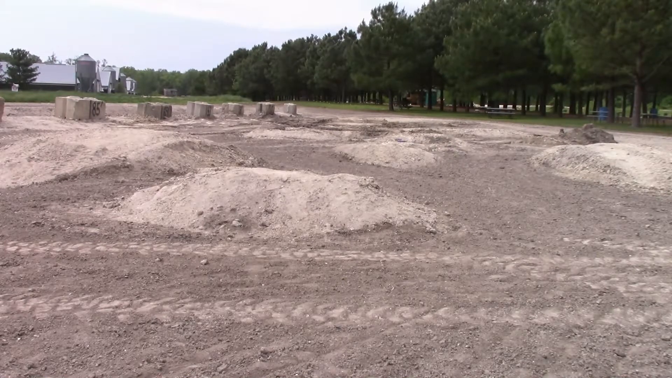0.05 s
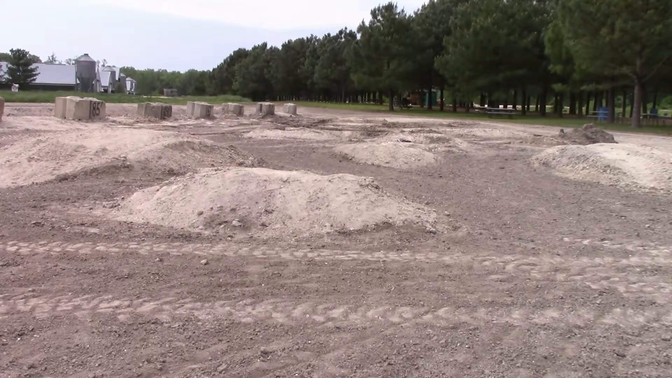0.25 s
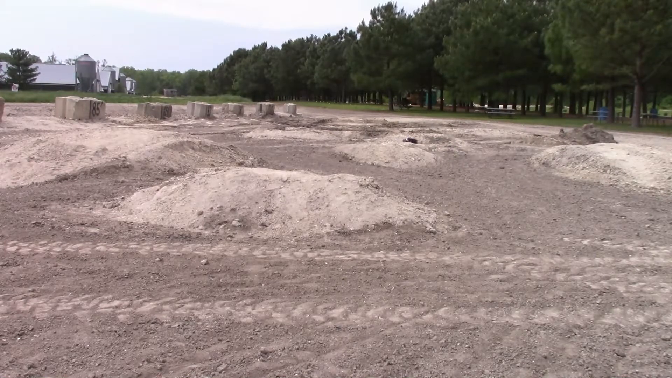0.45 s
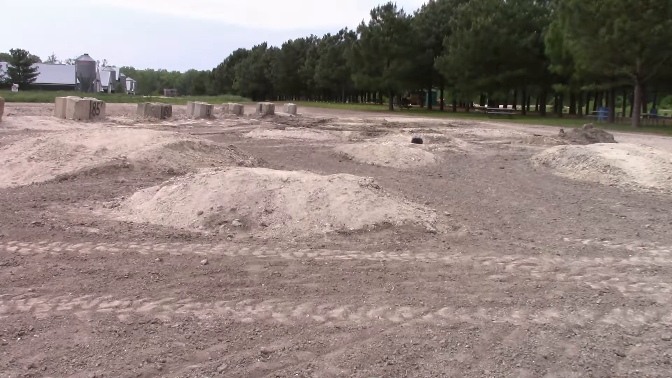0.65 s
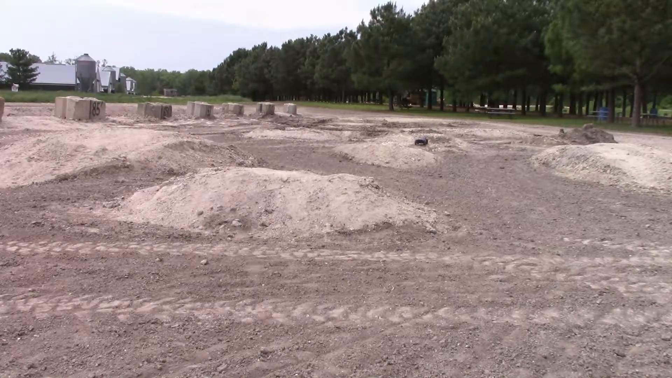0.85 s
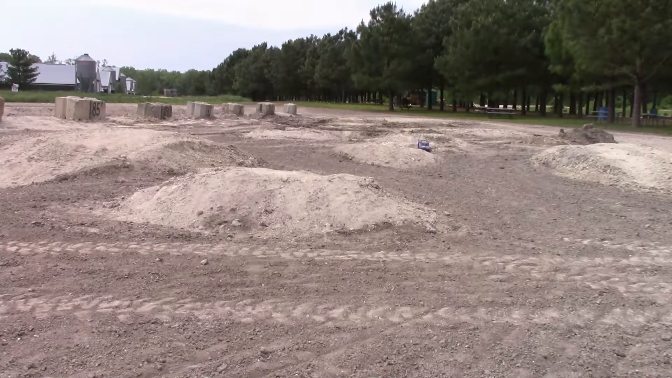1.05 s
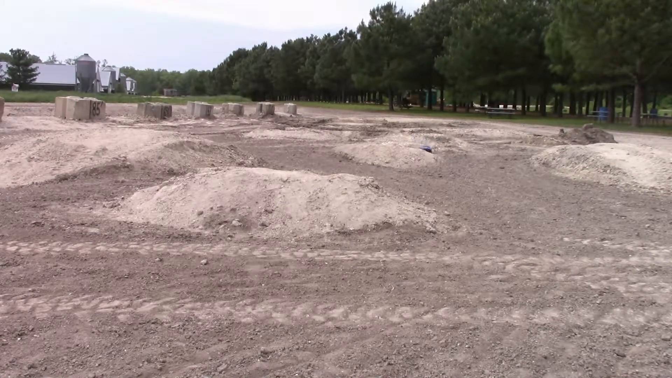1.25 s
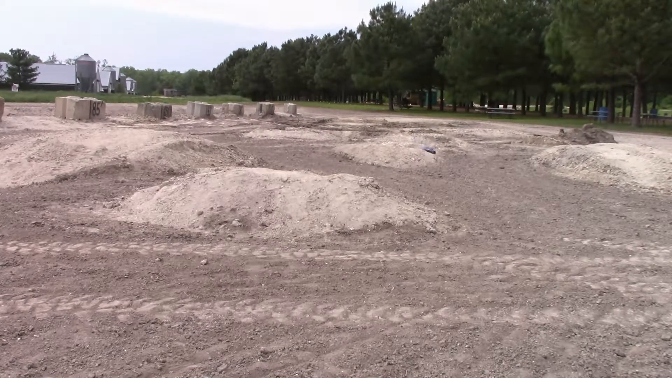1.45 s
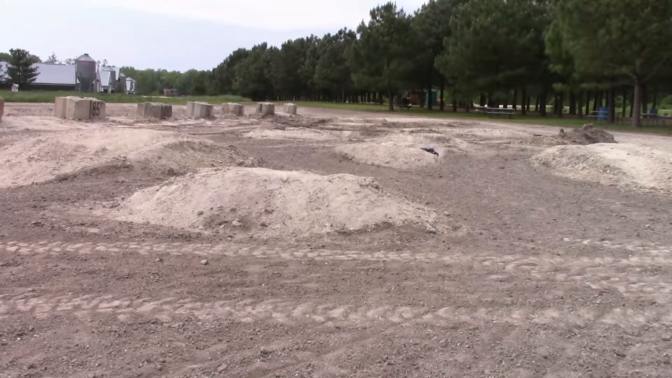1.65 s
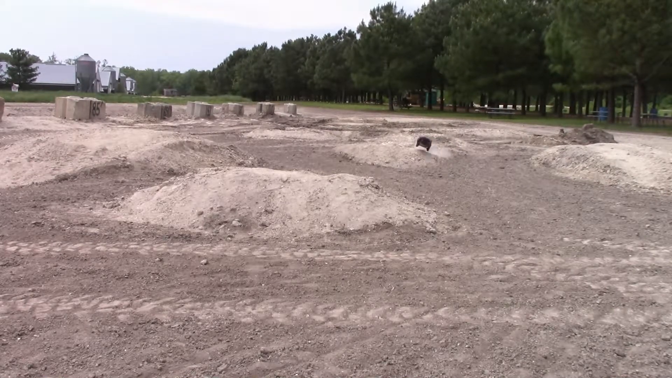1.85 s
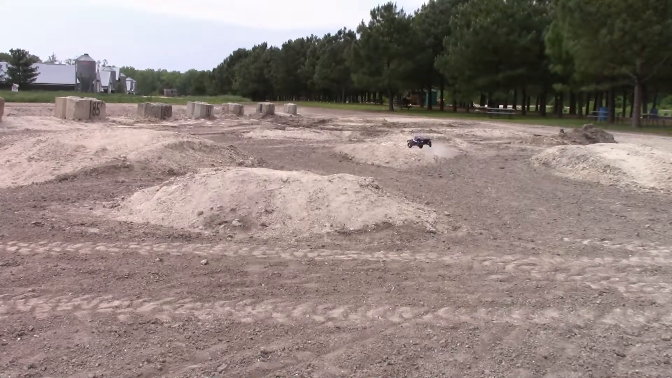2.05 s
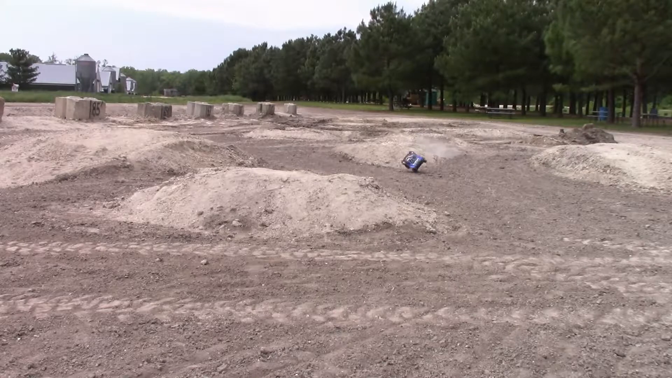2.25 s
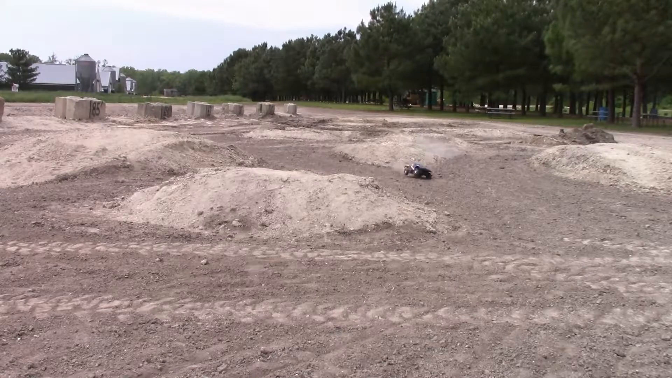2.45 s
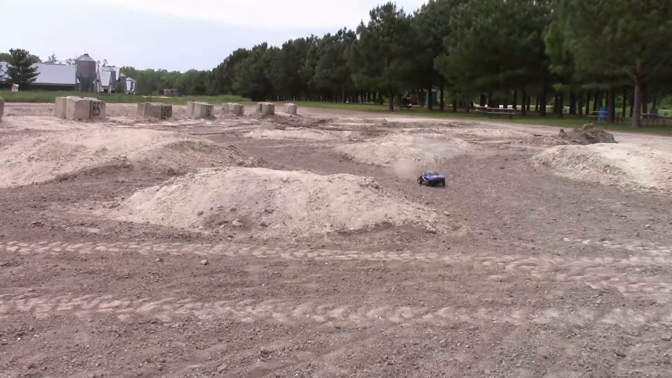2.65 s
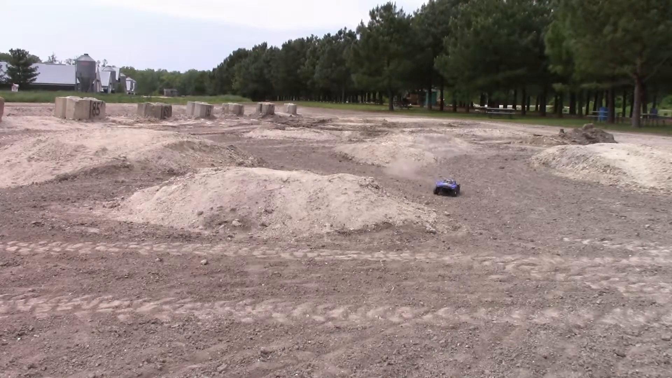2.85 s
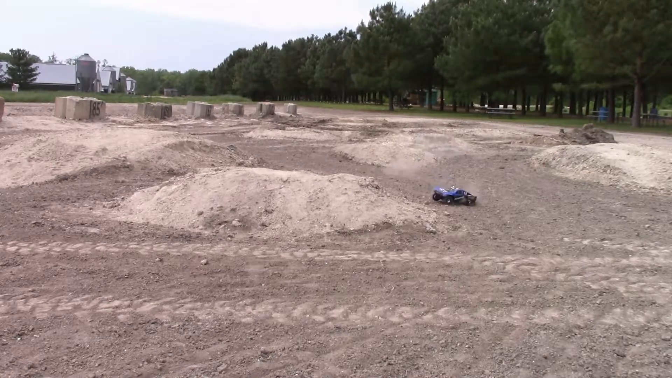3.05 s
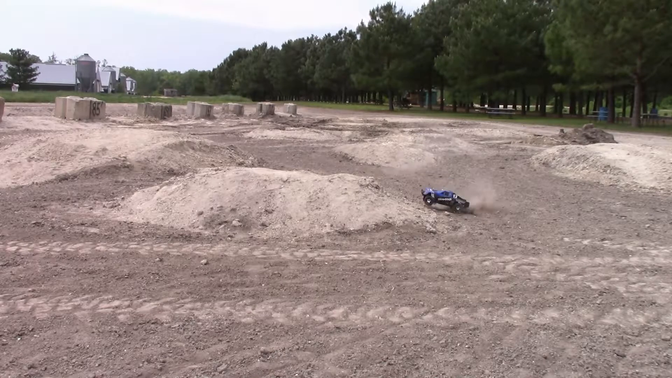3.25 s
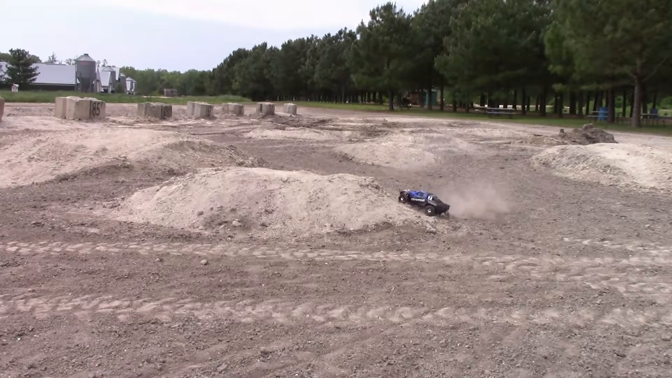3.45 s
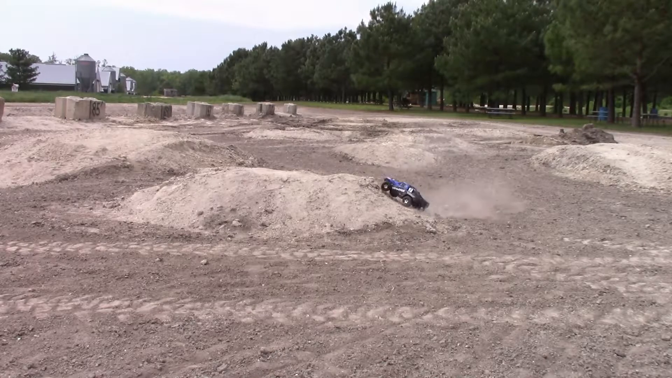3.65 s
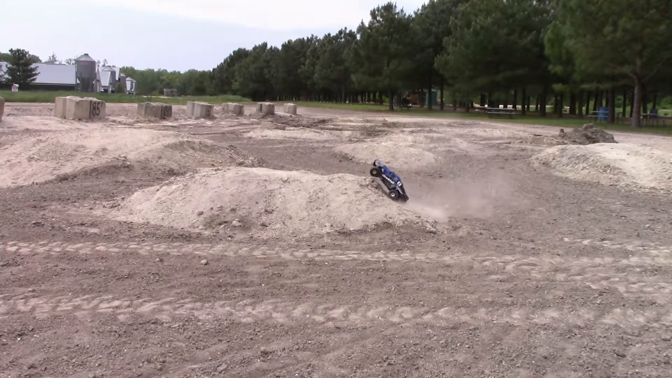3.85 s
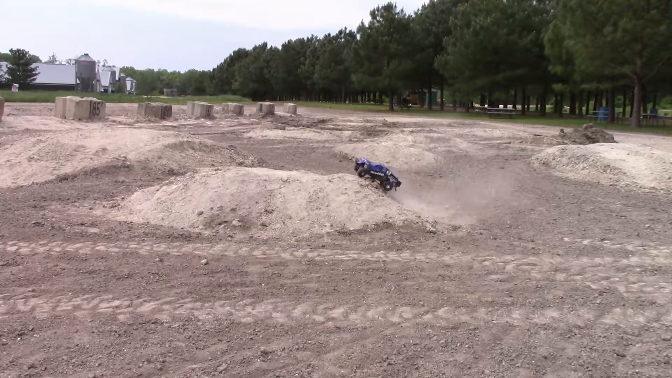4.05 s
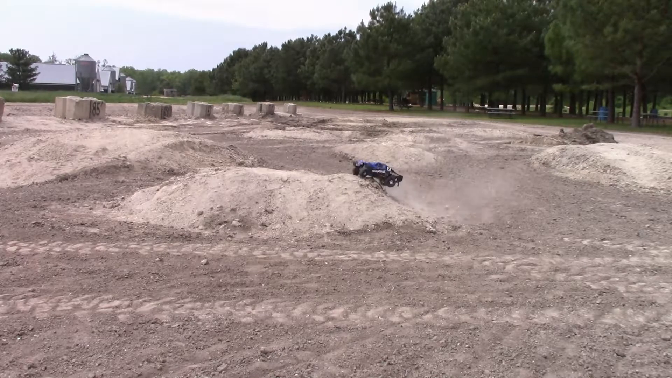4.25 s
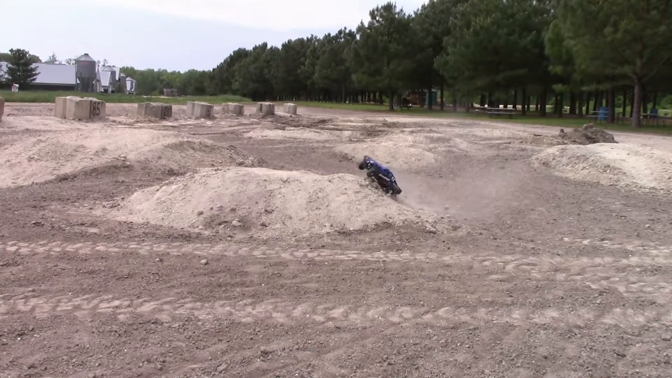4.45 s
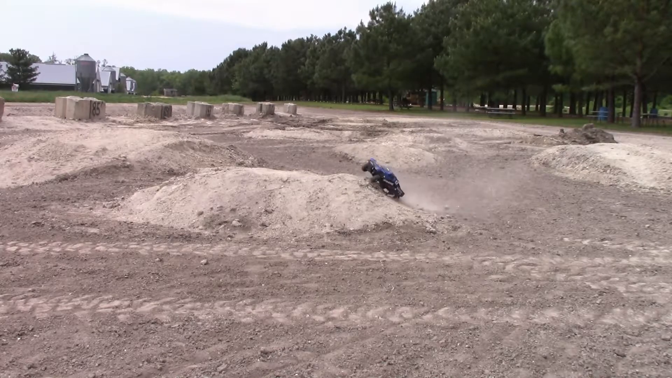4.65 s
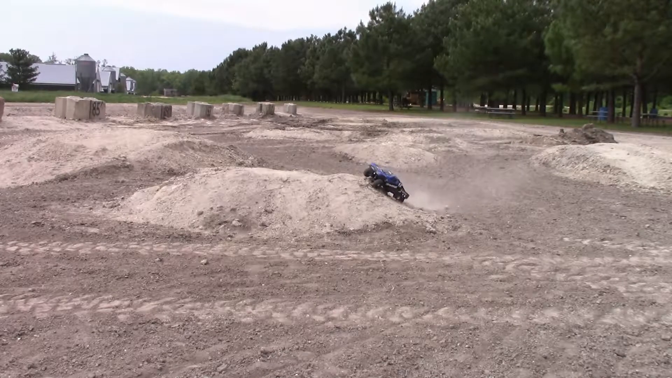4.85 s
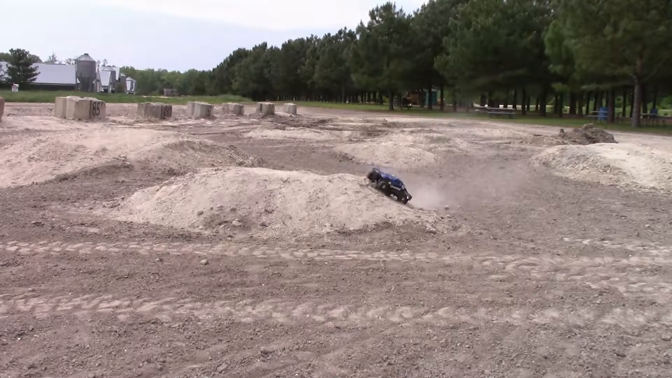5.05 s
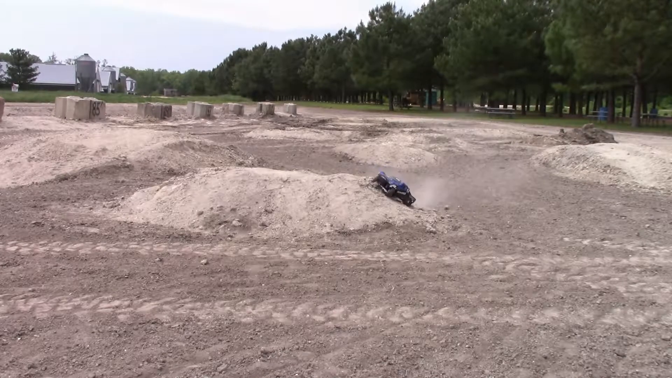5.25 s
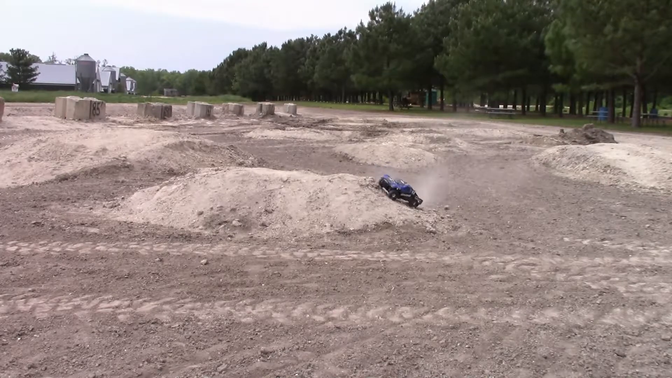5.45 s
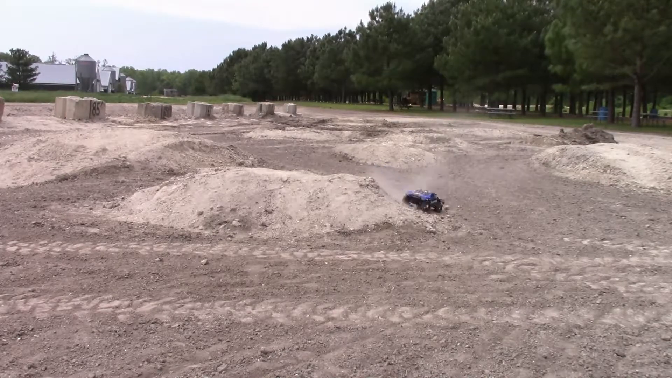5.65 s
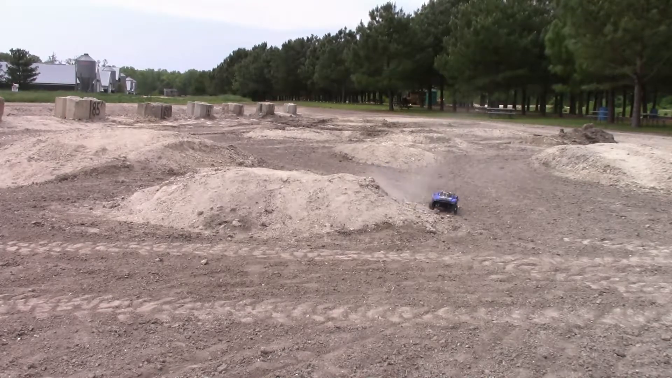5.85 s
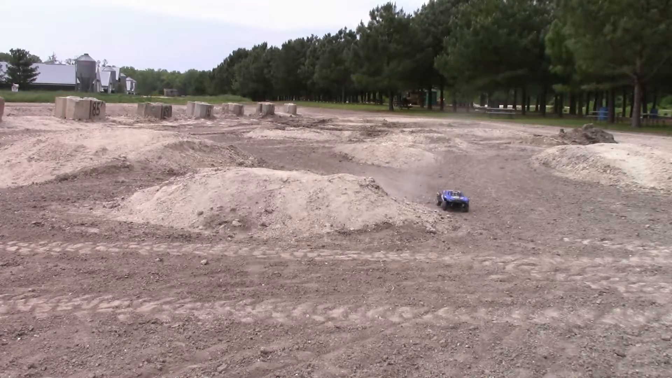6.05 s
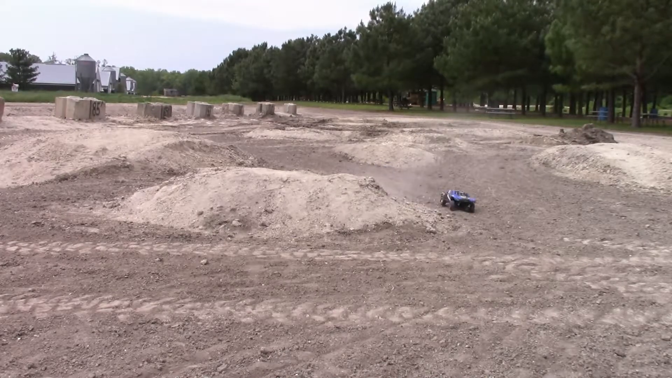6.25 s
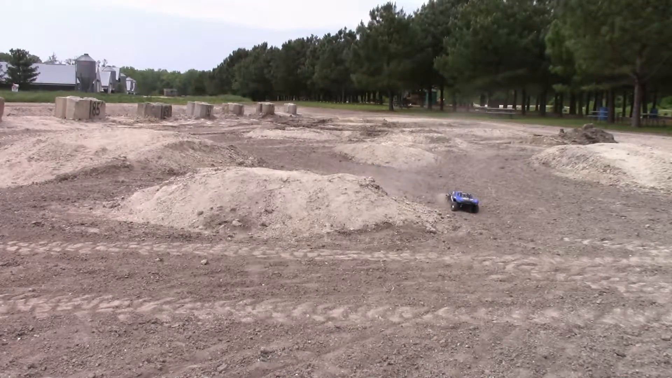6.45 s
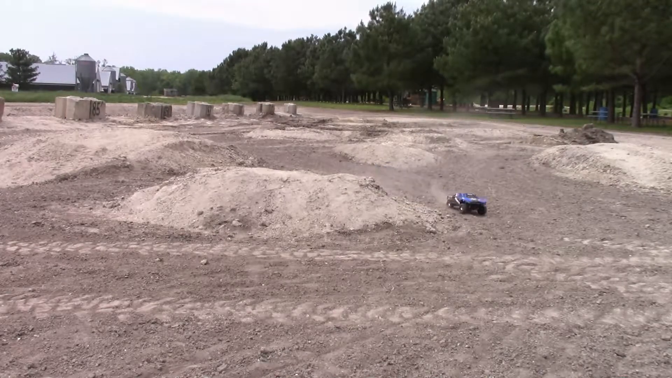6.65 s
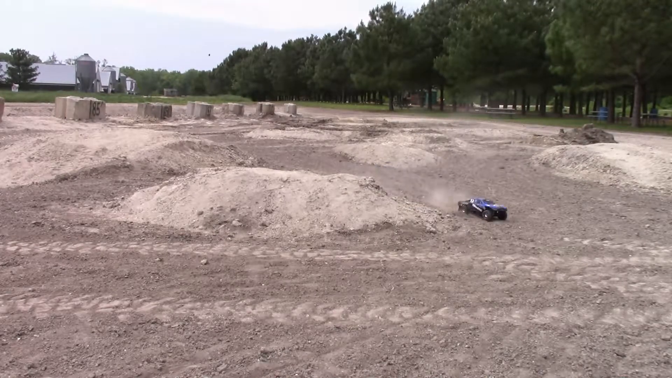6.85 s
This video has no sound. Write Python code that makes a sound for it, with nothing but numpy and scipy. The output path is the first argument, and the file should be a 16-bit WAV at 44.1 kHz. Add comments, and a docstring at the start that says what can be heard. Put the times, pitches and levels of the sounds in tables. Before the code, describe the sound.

An open dirt track with soft wind and barely audible pine hiss. From 0.5 s a small electric truck whines faintly in short, shuddering bursts around a high pitch, with light plastic ticks. At 1.55-1.8 s three much higher zips lead into a smooth, bright rush of free-spinning wheels, peaking near 1.9 s. It lands at 2.3 s with sharp clacks, more following at 2.5 s. From 2.7 s the motor drones upward and tyres roar nearer; between 3 and 4.9 s they scrabble hard, spraying grit, with whine bursts, a strong snap at 3.45 s and another at 4.65 s. Wind thumps the microphone around 3.3 and 4.3-4.8 s. It eases at 5 s into knocks, tiny squeaks and dirt patter. A strong whine rises at 5.45 s, then loose clatter. Brief revs and skids return at 6.25 and 6.55 s, with a hard clack near 6.8 s.

```python
"""Open-air dirt track: a small electric radio-controlled truck jumps, lands and scrabbles up a mound.
Gears: shuddering sine whine with overtones. Tyres: grain noise for roar, whir and grit, plus a jump swell.
Chassis: decaying noise clacks, short sung tones, dirt patter.
Background: low noise gusts and eddies on two microphone ports, fine turbulence, faint hiss of pines."""
import sys
import numpy as np
from scipy import signal
from scipy.fft import rfft, irfft, next_fast_len
from scipy.io import wavfile
from scipy.ndimage import uniform_filter1d, map_coordinates

SR = 44100
rng = np.random.default_rng(int(sys.argv[2]) if len(sys.argv) > 2 else 0)


def wrap_up_sound(samples):
    """Save the sound to the file named by the first command line argument, as 16-bit audio."""
    columns = np.atleast_2d(samples).T
    # keep every value between -1 and 1, then stretch to whole-number steps
    tamed = np.clip(columns, -1, 1)
    steps = np.round(tamed * 32767).astype(np.int16)
    wavfile.write(sys.argv[1], SR, steps)


N = 305172
TOP_HZ = 15810  # upper band limit


def amp(db):
    """Decibels to gain."""
    return 10 ** (np.asarray(db) / 20)


def unit(x):
    """x at rms 1."""
    return x / np.sqrt(np.mean(x ** 2) + 1e-20)


def along(points, hz):
    """(frequency [Hz], value) points read on a log-frequency axis."""
    point_hz, values = np.transpose(points)
    return np.interp(np.log(hz + 1), np.log(point_hz + 1), values)


def curves(rows):
    """One value per sample for each column after the time."""
    time_s, *columns = np.transpose(rows)
    return [np.interp(np.arange(N) / SR, time_s, column) for column in columns]


def wobble(rate):
    """Smooth random curve, rate knots per second."""
    coarse = np.arange(0, N + 32, 32)
    knots = coarse * rate / SR
    values = map_coordinates(rng.standard_normal(int(knots[-1]) + 4), [knots])
    return np.interp(np.arange(N), coarse, values)


def filtered(x, response):
    """x times a gain that is a function of frequency in Hz."""
    size = next_fast_len(N + 8192, True)
    return irfft(rfft(x, size) * response(np.fft.rfftfreq(size, 1 / SR)), size)[..., :N]


def coloured(x, spectrum):
    """x shaped by (frequency [Hz], level [dB]) points, at rms 1."""
    return unit(filtered(x, lambda hz: amp(along(spectrum, hz))))


def noise(spectrum):
    """Fresh Gaussian noise of rms 1 with this spectrum."""
    return coloured(rng.standard_normal(N), spectrum)


def grains(rate, spread_db, life):
    """Tiny random impacts, rate per second, mostly small, few large; noise bursts with decay constant life [s]."""
    draw = rng.random(N) * SR / rate
    hits = np.flatnonzero(draw < 1)
    power = np.zeros(N)
    size_db = spread_db * np.minimum(-np.log(draw[hits] + 1e-9), 5)
    power[hits] = amp(size_db) ** 2
    power = signal.lfilter([1], [1, -np.exp(-2 / (life * SR))], power)
    return np.sqrt(power) * rng.standard_normal(N)


def patchy(x, depth_db):
    """Clods and stones briefly recolour the noise: smoothed random gains over time and frequency."""
    bins = signal.stft(x, nperseg=256)[2]
    field = uniform_filter1d(rng.standard_normal(bins.shape), size=3, axis=0)
    field = uniform_filter1d(field, size=3, axis=1)
    return unit(signal.istft(bins * amp(depth_db * unit(field)), nperseg=256)[1][:N])


def scatter(x, t60):
    """Diffuse answer of the mounds: decaying noise tail, 60 dB in t60 [s], starting after 2 ms."""
    t = np.arange(SR // 4) / SR
    tail = rng.standard_normal(len(t)) * amp(-60 * t / t60) * (t > .002)
    return signal.oaconvolve(x, tail / np.linalg.norm(tail))[:N]


def add(track, s, sound):
    """Mix sound into track from time s [s]."""
    start = int(np.clip(round(s * SR), 0, N - 1))
    track[start:start + len(sound)] += sound[:N - start]


def trees(rustle_db=-61.5):
    """Wide faint hiss of pines: slowly wavering noise, independent per channel."""
    needles = [(30, -40), (200, -34), (1200, 6), (2500, 10), (4000, 1), (5300, 7.5),
               (7500, -20), (11000, -30), (15800, -48)]
    return amp(rustle_db + 3 * wobble(2.75)) * coloured(rng.standard_normal((2, N)), needles)


# breeze between gusts: (time [s], level [dB])
BREEZE_LEVELS = [(0, -61), (1.05, -69), (1.7, -58), (2.1, -61), (3.1, -44), (3.8, -56), (4.7, -47),
                 (5.6, -55), (6.92, -54)]
BREEZE_ACROSS_DB = -22  # port difference re breeze
# gusts: (middle [s], length [s], level [dB], port difference re gust [dB])
WIND_GUSTS = [(.33, .16, -51, -30), (.53, .16, -44, -30), (.69, .14, -47.5, -30), (2.37, .09, -38, -13),
              (2.75, .2, -35, -11), (3.0, .22, -38, -11), (3.34, .19, -30, -7), (4.31, .12, -28, -10),
              (4.49, .17, -29.5, -5), (4.7, .19, -27.5, -4), (5.05, .28, -38, -9), (5.41, .1, -41, -12),
              (5.98, .14, -42, -3), (6.2, .17, -28.5, -1), (6.85, .1, -38, 0)]


def airflow():
    """Wind level and crosswind in dB: gust powers add to the breeze, each with its own port difference."""
    t = np.arange(N) / SR
    power = amp(curves(BREEZE_LEVELS)[0]) ** 2
    across = power * amp(BREEZE_ACROSS_DB) ** 2
    for middle, length, db, across_db in WIND_GUSTS:
        away = np.square(2 * (t - middle) / length)
        gust = np.square(amp(db) / (1 + away * away))
        power = power + gust
        across = across + gust * amp(across_db) ** 2
    return 10 * np.log10(power), 10 * np.log10(across / power)


# strongest eddies at the ports: (middle [s], level [dB], length [s])
PORT_EDDIES = [(.132, -46, .027), (.54, -33, .04), (.586, -32, .014), (2.037, -31.5, .012),
               (2.175, -29, .03), (2.349, -20, .041), (2.403, -18.5, .014), (2.546, -26, .018),
               (2.664, -24, .03), (2.73, -21, .035), (2.93, -19, .033), (2.974, -19, .013),
               (3.206, -21.5, .04), (3.291, -10.5, .031), (3.323, -17, .018), (3.354, -10, .016),
               (3.399, -12, .011), (3.42, -17.5, .02), (3.499, -15, .019), (3.582, -20.5, .022),
               (4.073, -24, .037), (4.268, -28, .022), (4.305, -18.5, .025), (4.335, -8.5, .02),
               (4.447, -21, .015), (4.489, -11, .009), (4.507, -9, .016), (4.657, -16, .023),
               (4.692, -14, .043), (4.78, -14, .017), (4.965, -22.5, .025), (5.082, -22.5, .039),
               (5.142, -22, .018), (5.367, -22, .032), (5.824, -33, .03), (6.141, -18, .014),
               (6.214, -23, .027), (6.809, -23.5, .04), (6.901, -24.5, .02)]
EDDY_REF_DB, EDDY_DB_PER_OCTAVE = -21, 42  # level at normal swirl speed; level step that doubles it
# wind rumble spectrum: (frequency [Hz], level [dB per Hz])
BUFFET_SPECTRUM = [(20, -62), (40, -44), (65, -16.5), (100, -6), (150, 2.3), (240, 1), (330, -3.5),
                   (430, -9), (560, -18), (900, -28.5), (4000, -98)]
# weight of the port difference: (frequency [Hz], level [dB])
PORT_DIFFERENCE = [(30, -32), (70, -21), (150, -7), (280, 1), (550, 4), (1200, 2)]


def wind(level_db, across_db, breeze_db=4, lump_db=4.8, eddy_db=-0.73):
    """Turbulence on two ports: lumpy rumble plus eddies, nearly equal in deep bass and diverging above."""
    t = np.arange(N) / SR
    flows = []
    for _ in range(2):
        swirl = noise(BUFFET_SPECTRUM)
        flow = amp(level_db + breeze_db) * unit(amp(lump_db * wobble(40)) * swirl)
        for middle, db, length in PORT_EDDIES:
            near = slice(max(int((middle - 2 * length) * SR), 0), int((middle + 2 * length) * SR))
            offset = t[near] - middle
            shape = np.exp(-np.abs(2 * offset / length) ** 1.13)
            # stronger eddy: the same turbulence read faster
            speed = 2 ** ((db - EDDY_REF_DB) / EDDY_DB_PER_OCTAVE)
            puff = shape * np.interp(rng.uniform(1, t[-1] - 1) + offset * speed, t, swirl)
            flow[near] += amp(db + eddy_db) * puff * np.linalg.norm(shape) / np.linalg.norm(puff)
        flows.append(flow)
    common, apart = flows
    apart = amp(across_db) * filtered(apart, lambda hz: amp(along(PORT_DIFFERENCE, hz)))
    return np.array([common + apart, common - apart])


def churn(wind_db, churn_db=-38.5, ref_db=-30, grows=1.5, lump_db=3.5):
    """Finer turbulence, independent per port, growing 1.5 dB per dB of wind."""
    level_db = churn_db + grows * (wind_db - ref_db)
    fine = [(120, -35), (300, -6), (480, 0), (720, -3), (1100, -14), (2500, -38), (6000, -80)]
    return np.array([amp(level_db) * unit(amp(lump_db * wobble(55)) * noise(fine)) for _ in range(2)])


# singing or squeaking parts: (start [s], length [s], pitch [Hz], level [dB], pitch unsteadiness [fraction])
RINGING_PARTS = [(0.49, .12, 910, -49, .02), (1.8, .33, 681, -44, .023), (4.98, .03, 6100, -52, .04),
                 (5.208, .04, 5700, -50, .04), (5.208, .04, 8300, -50, .03), (5.222, .02, 11100, -50, .015),
                 (5.295, .04, 6050, -55, .05)]


def rings(flutter_db=2):
    """Truck parts sing briefly: wavering sines with fast onset and gradual fade."""
    out = np.zeros(N)
    waver, flutter = wobble(350), flutter_db * wobble(150)
    for s, length, hz, db, drift in RINGING_PARTS:
        u = np.arange(int(length * SR)) / (length * SR)
        near = int(s * SR) + np.arange(len(u))
        phase = 2 * np.pi * np.cumsum(hz * (1 + drift * waver[near])) / SR
        envelope = (1 - np.exp(-u / 0.05)) * (1 - u)
        add(out, s, 2 * amp(db + flutter[near]) * envelope * np.sin(phase))
    return out


# dirt showers: (start [s], fade by 20 dB [s], level [dB])
DIRT_SHOWERS = [(.6, 1.2, -60), (4.8, 1.0, -50), (5.66, .5, -53.5)]
# grit spectrum: (frequency [Hz], level [dB per Hz])
GRIT_SPECTRUM = [(600, -50), (2000, -20), (3300, 2), (4300, -3), (5400, -3), (6800, -1), (8200, 0.5),
                 (10500, -3.5), (12000, -9), (13200, -17), (14400, -11.5), (15800, -21)]


def patter():
    """Thrown dirt ticks on ground and shell: sparse bright grains in fading showers."""
    t = np.arange(N) / SR
    level = sum((t > s) * amp(db - 20 * np.maximum(t - s, 0) / fade) for s, fade, db in DIRT_SHOWERS)
    return level * coloured(grains(rate=70, spread_db=3.2, life=0.002), GRIT_SPECTRUM)


# run over the track, louder when fast and near:
# (time [s], rolling roar [dB], tread whir [dB], thrown dirt [dB])
DRIVE_LEVELS = [(0, -56, -54, -56), (.36, -58, -61, -69), (.62, -54, -52, -53.5), (1.15, -48, -52.5, -56.5),
                (1.55, -45.5, -53, -45.5), (2.1, -53, -52, -41.5), (2.25, -51, -53, -44),
                (2.4, -47, -46, -38), (2.62, -46, -51, -48), (2.72, -39.5, -50, -40), (2.95, -39, -46, -43),
                (3.2, -36.5, -40, -39), (3.55, -34.5, -34.5, -36), (4.02, -38.5, -35, -37),
                (4.27, -41, -38.5, -43.5), (4.72, -36, -38, -41), (4.9, -42, -42.5, -52),
                (5.3, -51.5, -53, -56), (5.68, -44, -52, -58), (6.13, -49.5, -59, -65),
                (6.4, -38.5, -45, -43), (6.92, -42, -44.5, -45)]
RATTLE_PER_S, RATTLE_DB, RATTLE_SPREAD_DB = 16, 5, 2.5  # rate, mean re rolling roar, spread


def rattles(body_db=-3):
    """Small blows at random times, level following the rolling roar; rows as in CHASSIS_CLACKS."""
    rolling = curves(DRIVE_LEVELS)[0]
    hits = np.flatnonzero(rng.random(N) < RATTLE_PER_S / SR)
    size_db = rolling + RATTLE_DB + RATTLE_SPREAD_DB * rng.standard_normal(N)
    return [(i / SR, size_db[i], body_db) for i in hits]


# stones and suspension on the chassis: (time [s], snap level [dB], body knock re snap [dB])
CHASSIS_CLACKS = [(.4855, -26, -6.5), (.649, -33, -3), (.8496, -33, -12), (1.029, -28, -14),
                  (1.6505, -24, -6), (1.732, -23, -9), (2.2822, -11.5, -7), (2.292, -15.5, -5),
                  (2.4732, -16, -15), (2.4934, -20, -6), (2.5351, -23, -3), (2.5526, -19, -18),
                  (2.9275, -19, -5), (3.044, -19, -3), (3.2417, -12, -6), (3.3015, -14, -1),
                  (3.4324, -18, -10), (3.4397, -7, -10), (3.5603, -13.5, 1), (3.894, -15, -10),
                  (3.914, -11, -17), (4.1082, -17, -16), (4.6434, -9, -8), (4.8742, -28, -5),
                  (4.9076, -29, -8), (5.138, -28, 2), (5.1622, -25, -7), (5.3707, -26, 1.5),
                  (5.5791, -25, -7), (5.599, -20, -4), (5.6198, -20, -3), (5.63, -23, 5), (5.6717, -25, 5),
                  (5.7124, -25, -10), (5.769, -32, 4), (5.7924, -32, 5), (5.823, -34, 3),
                  (5.898, -30.5, -4), (6.0206, -35, -14), (6.081, -34, -14), (6.1619, -22, -6),
                  (6.4328, -21, 3), (6.787, -12, -11)]


def chassis(snap_t60=0.017, knock_t60=0.05, snap_db=-5.3, knock_db=-6, attack=0.0006):
    """Each blow: bright hard-plastic snap plus duller, longer shell knock, both decaying noise."""
    snaps, knocks = np.zeros(N), np.zeros(N)
    t = np.arange(SR // 10) / SR
    rise = 1 - np.exp(-t / attack)
    for s, db, body_db in CHASSIS_CLACKS + rattles():
        add(snaps, s, rise * amp(db + snap_db - 60 * t / snap_t60))
        add(knocks, s, rise * amp(db + body_db + knock_db - 60 * t / knock_t60))
    shell = [(150, -20), (450, 10), (1000, 2), (2000, -10), (3200, 0), (4500, -17), (9000, -35)]
    return snaps * noise(GRIT_SPECTRUM) + knocks * noise(shell)


# jump: (full swell [s], rise by 20 dB [s], hold [s], fade by 20 dB [s], level [dB])
JUMP_SWELL = (1.87, .23, .11, .42, -30.3)
# wheels in the air, early then fast: (frequency [Hz], level [dB per Hz])
RACING_SPECTRUM = [(600, -45), (1100, -27), (1380, -9), (1570, -15), (1800, -1), (2500, 0), (3100, 0),
                   (3700, -4.5), (5000, -13), (8000, -24), (16000, -55)]
RACING_FAST_SPECTRUM = [(1100, -30), (1800, -8), (2400, 1), (3100, 0), (4000, -4), (5500, -7.5),
                        (7500, -14), (16000, -45)]


def jump(brighten_from=1.96, brighten_s=.17):
    """Wheels race unshaken in the air: one smooth noise swell crossfading to a brighter spectrum."""
    full, rise, hold, fade, db = JUMP_SWELL
    t = np.arange(N) / SR
    before = np.maximum(full - t, 0) / rise
    after = np.maximum(t - full - hold, 0) / fade
    level_db = db - 20 * before ** 2 - 20 * after ** 1.3
    fast = np.clip((t - brighten_from) / brighten_s, 0, 1)
    early, late = noise(RACING_SPECTRUM), noise(RACING_FAST_SPECTRUM)
    return amp(level_db) * (np.sqrt(1 - fast) * early + np.sqrt(fast) * late)


# wheelspin and skids: (start [s], hold [s], fade by 20 dB [s], roar [dB], whir [dB], grit [dB])
WHEELSPINS = [(.52, .06, .08, -50, -55, -70), (.875, .06, .1, -60, -46.5, -46.5),
              (1.48, .04, .07, -43, -58, -50), (1.66, .05, .07, -39, -41, -40),
              (1.75, .03, .1, -45, -42, -36), (1.795, .04, .36, -42, -43, -31.5),
              (2.283, .02, .05, -38, -35, -31), (2.445, .065, .05, -38, -44, -39),
              (2.55, .015, .03, -44, -43, -43), (3.015, .045, .08, -31, -39, -35),
              (3.135, .025, .07, -32.5, -33.5, -34), (3.2, .04, .04, -42, -44, -38),
              (3.285, .07, .08, -32, -39, -39), (3.415, .035, .08, -33, -37, -35),
              (3.66, .27, .08, -36, -31.5, -34.7), (3.93, .045, .05, -31, -32.5, -38),
              (4.065, .02, .05, -35, -37, -46), (4.195, .02, .04, -41, -36, -42),
              (4.38, .11, .1, -30, -33.5, -36), (4.51, .14, .17, -31.5, -30.5, -31),
              (5.41, .05, .06, -42, -41, -50), (5.475, .06, .05, -35, -36, -41.5),
              (5.6, .035, .05, -36, -39.5, -43.5), (6.255, .18, .08, -35.3, -42, -36.3),
              (6.58, .08, .08, -34, -38, -35.5), (6.69, .1, .12, -29.5, -37, -34)]
SPIN_ATTACK_S = .04  # 20 dB rise as the tyres break loose


def traction():
    """Roar, whir and grit levels in dB: steady rolling plus wheelspin bursts, added as power."""
    t = np.arange(N) / SR
    power = amp(curves(DRIVE_LEVELS)) ** 2
    for start, hold, fade, roar_db, whir_db, grit_db in WHEELSPINS:
        outside = np.maximum(start - t, 0) / SPIN_ATTACK_S + np.maximum(t - start - hold, 0) / fade
        near = outside < 4  # down to -80 dB
        power[:, near] += np.outer(amp([roar_db, whir_db, grit_db]), amp(-20 * outside[near])) ** 2
    return 10 * np.log10(power)


def chatter(rate=150, centre_hz=2500, spread=.29, length=.02, glide=.16, spread_db=3.5):
    """The drive train snatches under load: random short gliding sines, at rms 1."""
    out = np.zeros(N)
    u = np.linspace(-1, 1, int(length * SR))
    starts = np.flatnonzero(rng.random(N) < rate / SR) / SR
    draws = np.clip(rng.standard_normal((len(starts), 3)), -2, 1.5)
    for s, (pitch, slope, size) in zip(starts, draws):
        hz = centre_hz * np.exp(spread * pitch + glide * slope * u / 2)
        tone = np.sin(2 * np.pi * np.cumsum(hz) / SR)
        add(out, s, amp(spread_db * size) * (1 - u * u) * tone)
    return unit(out)


# tyre spectra, ground roar and tread whir: (frequency [Hz], level [dB per Hz])
ROAR_SPECTRUM = [(25, -50), (50, -17), (170, -8), (350, 2.5), (440, 2.5), (600, -6), (720, -1), (860, -5),
                 (1050, -3.5), (1170, -7), (1400, -3), (1600, -8), (2200, -15), (4000, -35), (9000, -54)]
WHIR_SPECTRUM = [(500, -55), (1100, -21), (1380, -4.5), (1620, -8), (1900, -1), (2600, 0), (3300, -2),
                 (4000, -6.5), (5200, -14.5), (9000, -19), (16000, -58)]


def tyres(roar_db=2.0, whir_db=-1.7, chatter_db=-6, grit_db=0.4, bump_db=1.3, rut_db=.8):
    """Knobbly tyres: dense grains make ground roar, tread whir and sprayed grit, all shaken by bumps."""
    rolling, spinning, thrown = traction()
    bumps = bump_db * wobble(70) + rut_db * wobble(22)
    ground = coloured(grains(rate=2800, spread_db=2.5, life=0.0031), ROAR_SPECTRUM)
    roar = amp(rolling + roar_db + bumps) * ground
    tread = patchy(coloured(grains(rate=3600, spread_db=3, life=0.0013), WHIR_SPECTRUM), depth_db=2)
    whir = amp(spinning + 0.62 * bumps) * (amp(whir_db) * tread + amp(chatter_db) * chatter())
    spray = patchy(coloured(grains(rate=5200, spread_db=3.7, life=0.0017), GRIT_SPECTRUM), depth_db=2.4)
    grit = amp(thrown + grit_db + bumps) * spray
    return roar + whir + grit


# throttle squeezes: (start [s], run-up [s], hold [s], start mesh pitch [Hz], reached pitch [Hz], level [dB])
THROTTLE_SQUEEZES = [(.5, .13, .21, 2900, 3350, -47.5), (.84, .075, .03, 2250, 3250, -41.5),
                     (.96, .03, .11, 3300, 3300, -47.5), (1.11, .035, .01, 3300, 2950, -50),
                     (1.175, .045, .01, 2500, 3600, -44.5), (1.24, .03, .26, 3400, 3450, -47.5),
                     (1.56, .07, .02, 6100, 7500, -39), (1.69, .055, .02, 6400, 7900, -38.5),
                     (1.775, .04, .025, 8100, 9100, -37.5), (2.67, .15, .04, 2850, 3550, -38.5),
                     (3.05, .05, .04, 2650, 2850, -39), (3.15, .04, .02, 2900, 3300, -37),
                     (3.33, .065, .03, 3300, 2700, -34.5), (3.52, .035, .01, 2600, 3100, -38),
                     (3.59, .055, .005, 1950, 3400, -31), (3.655, .03, .01, 4200, 6100, -37),
                     (4.31, .045, .01, 3200, 3400, -37), (4.375, .035, .02, 3300, 3850, -40),
                     (4.5, .045, .005, 6000, 7200, -32), (4.75, .025, .005, 3200, 2900, -36),
                     (4.82, .025, .012, 2650, 2600, -33.5), (5.43, .055, .04, 2000, 3450, -29.5),
                     (5.535, .02, .005, 3000, 2700, -33), (6.232, .042, .003, 1800, 3900, -33),
                     (6.553, .03, .04, 2300, 3150, -33.5), (6.62, .05, .02, 3900, 5800, -39.5)]
RUN_UP_DB = 17  # rise from squeeze start to end of run-up
HOLD_FADE_DB_PER_S, RELEASE_DB_PER_S = 22, 520  # whine decay while held, after release
COAST_S = .22  # time constant of the pitch fall


def motor():
    """Mesh pitch [Hz], level [dB], squeeze age [s]: run-up, hold, coast; the loudest squeeze rules."""
    pitch, level_db = np.full(N, 2000.), np.full(N, -90.)  # idle values
    age = np.zeros(N)
    for start, run_up, hold, from_hz, to_hz, db in THROTTLE_SQUEEZES:
        first = max(int((start - 2 * run_up) * SR), 0)
        last = min(int((start + run_up + hold) * SR) + SR // 4, N)
        near = np.arange(first, last)
        t = near / SR - start
        progress = np.minimum(t / run_up, 1)
        held = np.clip(t - run_up, 0, hold)
        coasting = np.maximum(t - run_up - hold, 0)
        loud = db - RUN_UP_DB * (1 - progress) ** 2
        loud = loud - HOLD_FADE_DB_PER_S * held - RELEASE_DB_PER_S * coasting
        speed = from_hz + (to_hz - from_hz) * np.maximum(progress, 0)
        speed = speed * np.exp(-coasting / COAST_S)
        rules = loud > level_db[near]
        pitch[near[rules]] = speed[rules]
        level_db[near[rules]] = loud[rules]
        age[near[rules]] = np.maximum(t[rules], 0)
    return pitch, level_db, age


def controller(pitch, level_db, switch_hz=8050, sing_db=-63):
    """Chopped motor current sings: a noise-modulated sine, on at audible whine below 4500 Hz mesh pitch."""
    driven = np.clip((level_db + 62) / 10, 0, 2) * (pitch < 4500)
    carrier = np.sin(2 * np.pi * switch_hz * np.arange(N) / SR)
    return driven * amp(sing_db + 2.5 * wobble(20)) * wobble(350) * carrier


SHUDDER_ONSET_S = .055  # squeeze age at which the shudder deepens
CASE_HZ, CASE_WIDTH_HZ, CASE_DB = 7700, 500, 10  # gear case resonance lifting the overtones


def gears(pitch, level_db, age, shudder_hz=72, sag=0.1, jitter=.026, flutter_db=3, second_db=-19,
          third_db=-22, echo_db=-9, gain_db=1.1, hum_db=-6, early_shudder=.62, rasp_db=-11,
          lower_ratio=.82, lower_db=-15):
    """Mesh tone whose pitch jumps up and sags as tyres grip and slip; overtones, rasp, shaft hum, echo."""
    depth = 1 - (1 - early_shudder) * np.exp(-(age / SHUDDER_ONSET_S) ** 4)
    slips = np.cumsum(shudder_hz * np.exp(0.4 * wobble(60))) / SR % 1
    bend = 1 + depth * (sag * (1 - 2 * slips) + .02 * wobble(90)) + jitter * wobble(600)
    phase = 2 * np.pi * np.cumsum(pitch * bend) / SR
    tone = np.sin(phase) + amp(lower_db + 4 * wobble(45)) * np.sin(lower_ratio * phase)
    for k, db in enumerate([second_db, third_db], start=2):
        case_db = CASE_DB * np.exp(-((k * pitch - CASE_HZ) / CASE_WIDTH_HZ) ** 2)
        in_band = np.clip((TOP_HZ - k * pitch) / 1500, 0, 1)  # fades out towards TOP_HZ
        tone = tone + amp(db + case_db) * np.sin(k * phase) * in_band
    # teeth press hardest in mid-grip
    grip = np.abs(np.sin(np.pi * slips)) ** 1.3
    swell = (1 - depth + depth * grip) * amp(flutter_db * wobble(110))
    # tooth backlash
    rasp = 1 + amp(rasp_db) * noise([(50, 0), (600, 0), (1400, -14), (3000, -50)])
    whine = amp(level_db + gain_db) * unit(tone * swell * rasp)
    shaft = np.sin(phase / 9)  # motor shaft, a ninth of mesh pitch
    hum = amp(level_db + hum_db + 3.2 * wobble(50)) * shaft
    return whine + hum + amp(echo_db) * scatter(whine, t60=0.039)


def scene(width_db=-33):
    """Truck in the centre with a faint wide echo; wind and trees wide."""
    wind_db, across_db = airflow()
    background = trees() + wind(wind_db, across_db) + churn(wind_db)
    pitch, level_db, age = motor()
    body = rings() + patter() + chassis()
    wheels = jump() + tyres()
    drive = controller(pitch, level_db) + gears(pitch, level_db, age)
    truck = body + wheels + drive
    side = amp(width_db) * scatter(truck, t60=0.04)
    return background + truck + np.array([side, -side])


def record(dry, low_cut_hz=36):
    """Microphone chain: soft-limits peaks, rolls off deep bass, cuts everything from TOP_HZ up."""
    rounded = dry / (1 + (np.abs(dry) / .9) ** 6) ** (1 / 6)
    return filtered(rounded, lambda hz: (hz < TOP_HZ) * hz ** 2 / np.hypot(hz ** 2, low_cut_hz ** 2))


dry = scene()
out = record(dry)
wrap_up_sound(out)
```